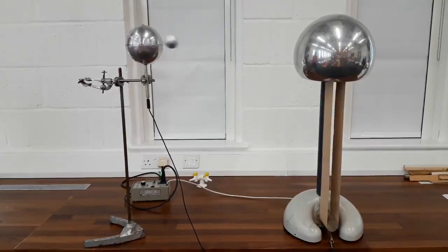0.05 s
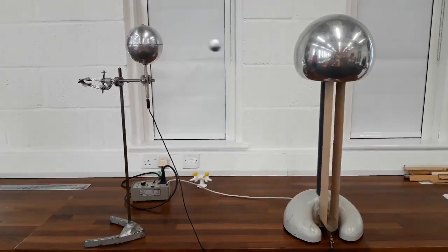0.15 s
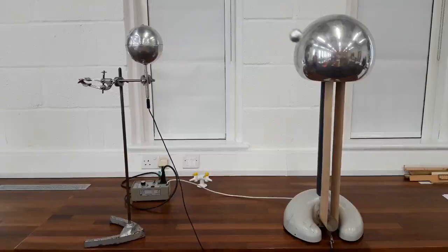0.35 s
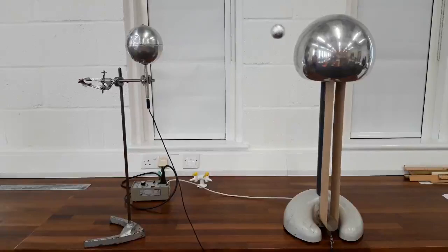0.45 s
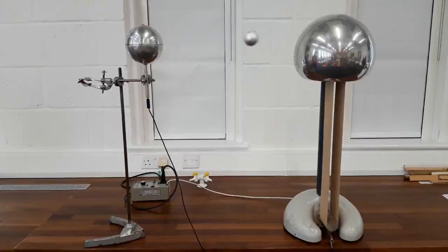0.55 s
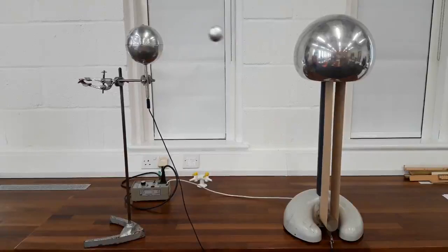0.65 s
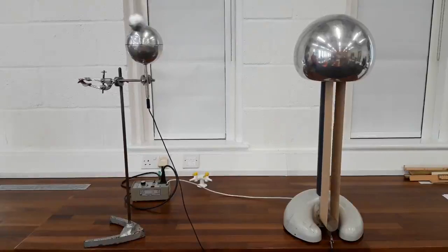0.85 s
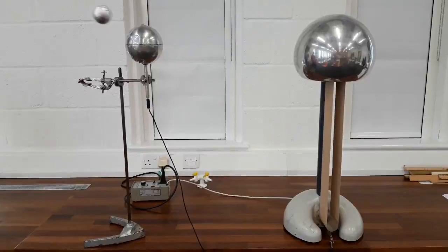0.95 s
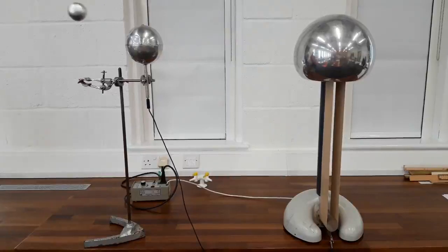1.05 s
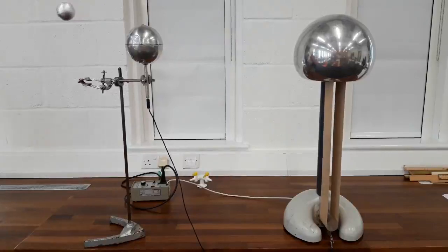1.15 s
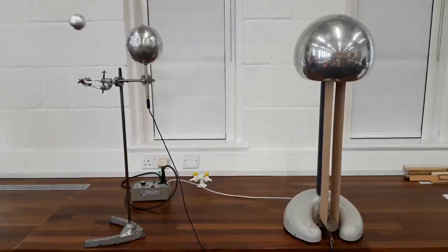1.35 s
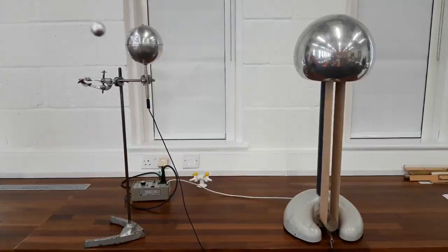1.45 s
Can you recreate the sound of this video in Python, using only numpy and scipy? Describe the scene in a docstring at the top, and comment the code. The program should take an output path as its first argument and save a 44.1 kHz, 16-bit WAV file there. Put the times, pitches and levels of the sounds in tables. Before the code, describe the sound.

One sharp electric spark cracks indoors over hissing crackle and a low generator hum.

```python
"""Tiny discharges crackle and hiss over the motor and belt drone of an electrostatic generator.
One big spark cracks from the charged dome; its shock fronts reflect off the bench and the hard
walls of the room, and the metal spheres ring on in their natural modes. The crackle falls away,
then grows again as the charge builds back up."""
import sys
import numpy as np
from scipy import signal
from scipy.fft import rfft, irfft
from scipy.io import wavfile
from scipy.ndimage import uniform_filter1d

SR = 44100
rng = np.random.default_rng(int(sys.argv[2]) if len(sys.argv) > 2 else 0)


def to_wav(sig):
    """Store sig (one row per channel, or 1-D mono) as 16-bit WAV at the path in sys.argv[1].

    Samples outside -1..1 are clipped; the rate is SR.
    """
    pcm = np.clip(np.atleast_2d(sig), -1, 1) * 32767
    pcm = np.round(pcm).astype(np.int16)
    wavfile.write(sys.argv[1], SR, pcm.T)  # frames by channels


N = 66150
T = np.arange(N) / SR

# reverberation time of the room: frequency_hz, t60_s
ROOM_DECAY = [(100, 0.98), (500, 0.52), (1500, 0.82), (4000, 0.62), (8000, 0.45), (12000, 0.4), (16000, .3)]
# spectrum of the machine's rumble: frequency_hz, gain_db
RUMBLE_SPECTRUM = [(20, -28), (60, -19), (120, 0), (300, 7.5), (500, 1), (1000, -1), (2500, 5.5),
                   (8000, -18.5)]
# frame resonances shaken by the belt: pitch_hz, width_hz, level_db
FRAME_MODES = [(101, 21, -77), (151, 67, -77.5), (275, 72, -62), (360.8, 66, -62.5), (582.3, 35, -72.5),
               (764, 52, -68.5), (863.6, 58.5, -58), (1149, 28, -73), (1786, 74, -71)]
# motor and mains tones: pitch_hz, level_db
HUM_TONES = [(50, -99), (100, -79.5), (200, -76.5), (253, -70.5), (350, -65.5), (851, -69.5), (875, -68.5)]
# gain on rumble, frame and hum, dipping after the crack: time_s, gain_db
DRONE_CONTOUR = [(0, 4.5), (.14, 6), (.3, 4), (.45, 4.5), (.6, 1), (.9, 1), (1.0, 0.5), (1.12, -.5),
                 (1.28, 0), (1.5, -0.5)]
# belt scraping on its rollers: pitch_hz, width_hz, level_db
SCRAPE_BANDS = [(2133, 120, -71.5), (2506, 100, -69.5)]
# course of the corona hiss: time_s, level_db
HISS_CONTOUR = [(0, -44.5), (.15, -47), (.19, -51), (.22, -44), (.38, -50.5), (.45, -58), (.66, -57),
                (.85, -56), (1.0, -56), (1.2, -55), (1.29, -59), (1.36, -53), (1.40, -57), (1.44, -50.5),
                (1.5, -54.5)]
# spectrum of the hiss: frequency_hz, gain_db
HISS_SPECTRUM = [(100, -11.5), (600, -3), (1200, -1.5), (2500, -0.5), (5000, 0), (8000, 0), (11000, -4),
                 (15500, -9)]
# small discharges: start_s, level_db
DISCHARGES = [(0.0083, -14), (0.0121, -17), (0.0332, -12), (0.0443, -18), (0.0598, -11), (0.0862, -15.7),
              (0.093, -12), (0.1062, -13), (0.1228, -11.5), (0.1381, -12.5), (0.1444, -31), (0.1517, -13.6),
              (0.2007, -11), (0.2043, -17.5), (0.2089, -11.5), (0.2146, -18), (0.2334, -12.5),
              (0.2471, -11), (0.261, -14.4), (0.2799, -14.6), (0.2926, -9.5), (0.3266, -15.1),
              (0.3406, -15), (0.6773, -23), (0.6966, -27), (0.7086, -23), (0.7387, -32), (0.7432, -26),
              (0.7828, -22), (0.8028, -22.5), (0.8213, -22), (0.9082, -24), (0.9225, -25), (0.9278, -28),
              (0.9525, -21), (0.9697, -20.5), (0.9789, -23), (0.999, -23.9), (1.0396, -21.5),
              (1.0582, -19.5), (1.0715, -19.5), (1.0935, -19), (1.1332, -20), (1.1633, -18), (1.1905, -18),
              (1.2155, -18.8), (1.2273, -20.5), (1.2466, -19.5), (1.3122, -15), (1.3391, -20.5),
              (1.4085, -16.5), (1.4179, -19), (1.4299, -16.5), (1.4535, -24), (1.4594, -29.5),
              (1.4688, -16), (1.4768, -17.5)]
# spectrum of a small discharge: frequency_hz, gain_db
DISCHARGE_SPECTRUM = [(100, -47), (700, -13.5), (2000, -9), (4000, -4.5), (6000, -1), (9000, -0.5),
                      (11000, -4), (15500, -8.5)]
# modes of the metal spheres: pitch_hz, level_db, t60_s
SPHERE_MODES = [(268.3, -53, 0.88), (816.5, -36, 0.93), (834.5, -38.5, 0.87), (1799, -52.5, 1.37),
                (3170, -47, 0.36), (3870, -56, 0.37)]
# spectrum of the spark's shock fronts: frequency_hz, gain_db
SHOCK_SPECTRUM = [(30, -31), (130, -9.5), (220, -16), (450, -7.5), (1000, -3.5), (2500, -3.5), (4500, -6.5),
                  (7000, 0.5), (9500, 3.5), (15000, -2.5)]
# early reflections from bench, walls and ceiling: delay_ms, level_db
REFLECTIONS = [(2.2, -18.5), (4.5, -13.5), (5.35, -10), (6.25, -3), (8.6, -3), (14.0, -7), (17.0, -10.5),
               (18.5, -21), (19.2, -3), (20.25, -11), (21.2, -14), (22.6, -8), (24.8, -16), (28.0, -11.5)]
# spectrum of the spark's reverberation: frequency_hz, gain_db
TAIL_SPECTRUM = [(30, -29), (130, -13.5), (200, -12), (500, -5), (900, -2), (1500, -6), (2200, -6),
                 (4000, 1), (6500, 2.5), (8000, 5), (9200, 2.5), (12000, -2), (15000, -3)]
# response of the microphone port: frequency_hz, gain_db
PORT_RESPONSE = [(8000, -0.5), (8700, 2.5), (9300, 6.5), (9850, 2.5), (10500, -3), (11200, 0.5), (12000, 1),
                 (12500, -3), (13500, 0), (15600, -0.5), (16100, -15)]

SPARK_S = .3848


def undb(db):
    """Amplitude grows tenfold for every 20 dB."""
    return 10 ** (np.asarray(db) / 20)


def unit(x):
    """Dividing by the rms gives a signal of unit power."""
    return x / np.sqrt(np.mean(x ** 2))


def decay(age_s, t60_s):
    """Exponential damping loses 60 dB in each t60_s."""
    return np.exp(-np.log(1000) * age_s / t60_s)


def on_log_axis(points, hz):
    """Interpolation in log frequency gives each octave equal room."""
    knots_hz, values = np.array(points).T
    return np.interp(np.log(np.maximum(hz, 1)), np.log(knots_hz), values)


def colour(x, spectrum):
    """A minimum-phase filter, made by folding the cepstrum, imposes a spectrum causally."""
    size = 4096
    gain = undb(on_log_axis(spectrum, np.fft.rfftfreq(size, 1 / SR)))
    cepstrum = irfft(np.log(gain))
    cepstrum[1:size // 2] *= 2
    cepstrum[size // 2 + 1:] = 0
    return signal.fftconvolve(x, irfft(np.exp(rfft(cepstrum))))[:N]


def resonant_noise(hz, width_hz):
    """Two resonators in series select a narrow band from a random force."""
    peak = signal.iirpeak(hz, hz / width_hz, fs=SR)
    return signal.lfilter(*peak, signal.lfilter(*peak, rng.standard_normal(N)))


def wander(rate_hz):
    """Smoothing and limiting random steps gives a slow fluctuation of unit rms."""
    hold = int(SR / rate_hz)
    steps = np.repeat(rng.standard_normal(N // hold + 3), hold)
    smooth = uniform_filter1d(uniform_filter1d(steps, hold), hold)
    return unit(np.tanh(smooth[hold:hold + N]))


def impulses(events):
    """A brief event acts as an impulse: one for each start_s, level_db row."""
    out = np.zeros(N)
    for start_s, db in events:
        out[int(np.clip(start_s * SR, 0, N - 1))] += undb(db)
    return out


def room(build_s=.02):
    """A diffuse field of unit energy builds up, then decays; the treble dies first."""
    hz = np.fft.rfftfreq(N, 1 / SR)
    noise = rfft(rng.standard_normal(N))
    centres_hz, t60s = np.array(ROOM_DECAY).T
    field = 0
    for weights, t60_s in zip(np.eye(len(t60s)), t60s):
        band = on_log_axis(list(zip(centres_hz, weights)), hz)
        field += irfft(noise * band, N) * decay(T, t60_s)
    return unit(field * (1 - np.exp(-T / build_s))) / np.sqrt(N)


def drone(rumble_db=-65.5, pitch_drift=.0039, waver_db=6):
    """Forced vibration: the belt shakes the frame's resonances over rumble and wavering motor tones."""
    out = undb(rumble_db) * unit(colour(rng.standard_normal(N), RUMBLE_SPECTRUM))
    for hz, width_hz, db in FRAME_MODES:
        out += undb(db) * unit(resonant_noise(hz, width_hz))
    for hz, db in HUM_TONES:
        cycles = np.cumsum(hz * (1 + pitch_drift * wander(rate_hz=9.8))) / SR
        waver = undb(waver_db * wander(rate_hz=10.52))
        out += undb(db) * unit(np.sin(2 * np.pi * cycles) * waver)
    return out * undb(np.interp(T, *np.array(DRONE_CONTOUR).T))


def belt(swell_db=8):
    """Friction between belt and rollers makes faint bands of noise that swell unevenly."""
    out = 0
    for hz, width_hz, db in SCRAPE_BANDS:
        scrape = resonant_noise(hz, width_hz) * undb(swell_db * wander(rate_hz=25.13))
        out += undb(db) * unit(scrape)
    return out


def corona(grains_per_s=6000, spread_db=2.5, flicker_db=2):
    """Shot noise: countless faint discharges merge into a hiss that follows the dome's charge."""
    fires = rng.random(N) < grains_per_s / SR
    grains = fires * rng.choice([-1, 1], N) * undb(spread_db * rng.standard_normal(N))
    level_db = np.interp(T, *np.array(HISS_CONTOUR).T) + flicker_db * wander(rate_hz=40.2)
    return unit(colour(grains, HISS_SPECTRUM)) * undb(level_db)


def crackle(gain_db=4, reverb_db=-7.5):
    """Each tiny discharge is an impulsive source: a sharp click, then the room's reverberation."""
    clicks = colour(impulses(DISCHARGES), DISCHARGE_SPECTRUM) * undb(gain_db)
    return clicks + undb(reverb_db) * signal.fftconvolve(clicks, room())[:N]


def sphere_ring(rise_s=.027):
    """Free vibration: excited by the spark, the metal spheres ring in damped modes."""
    age_s = np.maximum(T - SPARK_S, 0)
    modes = sum(undb(db) * np.sin(2 * np.pi * hz * age_s) * decay(age_s, t60_s)
                for hz, db, t60_s in SPHERE_MODES)
    return modes * (1 - np.exp(-age_s / rise_s))


def spark_reverberation(room_db=6, scatter_db=3.5, scatter_t60_s=.12, scatter_delay_s=.017):
    """Scattering from nearby things adds a short, dense burst to the spark's diffuse tail."""
    scatter = unit(rng.standard_normal(N) * decay(T, scatter_t60_s)) / np.sqrt(N)
    tail = signal.fftconvolve(impulses([(SPARK_S, room_db)]), room())
    tail += signal.fftconvolve(impulses([(SPARK_S + scatter_delay_s, scatter_db)]), scatter)
    return colour(tail[:N], TAIL_SPECTRUM)


def spark(gain_db=6.5, front_gap_ms=.21, lead_front_db=-12):
    """The spark launches a double shock front; reflection returns the main front as distinct echoes."""
    direct = [(SPARK_S - front_gap_ms / 1000, lead_front_db), (SPARK_S, 0)]
    echoes = [(SPARK_S + delay_ms / 1000, db) for delay_ms, db in REFLECTIONS]
    return undb(gain_db) * colour(impulses(direct + echoes), SHOCK_SPECTRUM)


def scene():
    """Superposition: the pressures of all sources add at one microphone."""
    return (crackle() + spark() + spark_reverberation() + sphere_ring() + corona() + drone() + belt())[None]


def record(dry):
    """Port resonance lifts the microphone's treble, overload clips the crack and a low-pass cuts the top."""
    overload, cutoff_hz = 1.2, 16200
    clipped = np.clip(colour(dry[0], PORT_RESPONSE), -overload, overload)
    low_pass = signal.ellip(8, .2, 70, cutoff_hz, fs=SR, output="sos")
    return signal.sosfilt(low_pass, clipped)[None]


dry = scene()
out = record(dry)
to_wav(out)
```